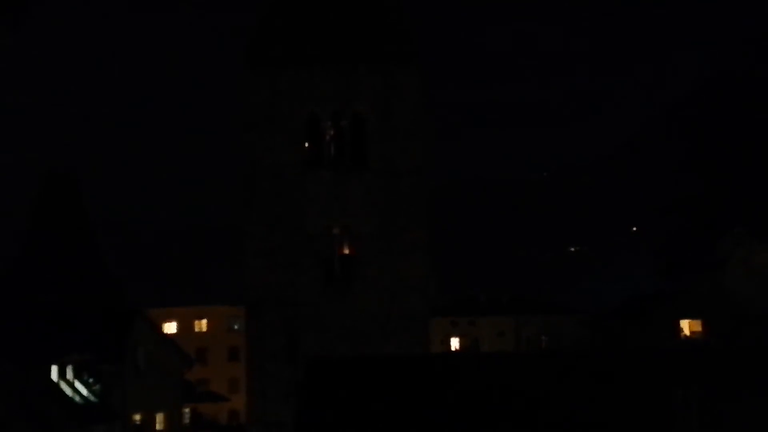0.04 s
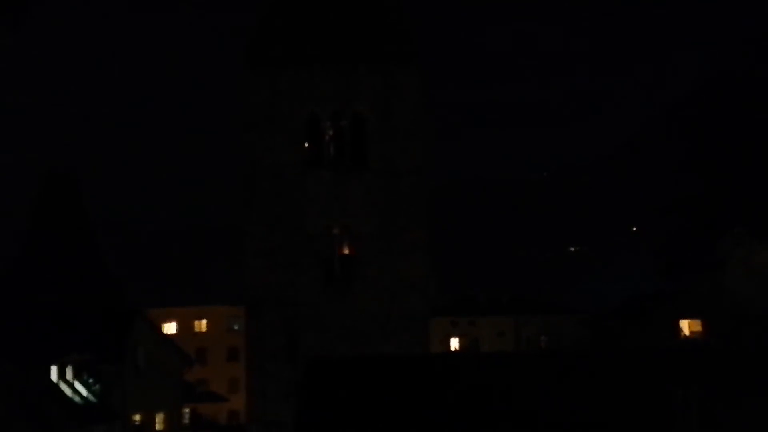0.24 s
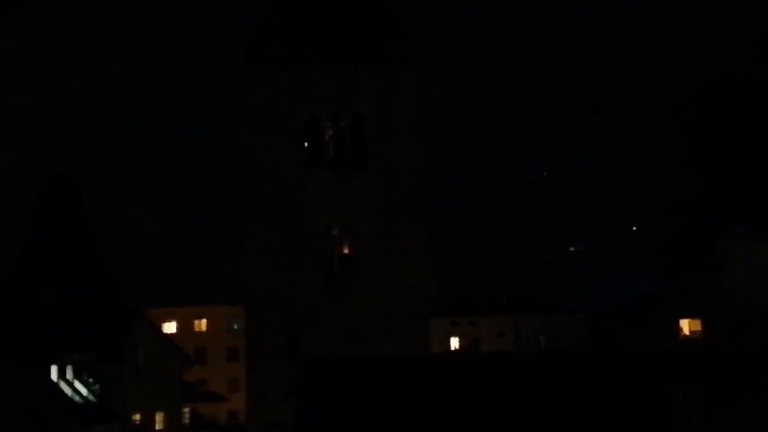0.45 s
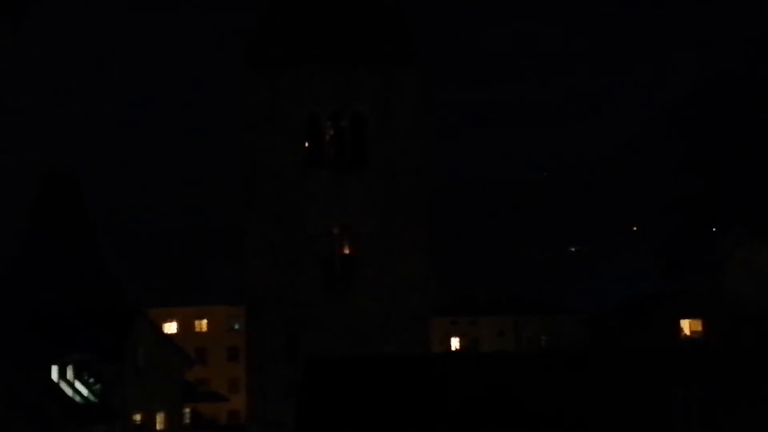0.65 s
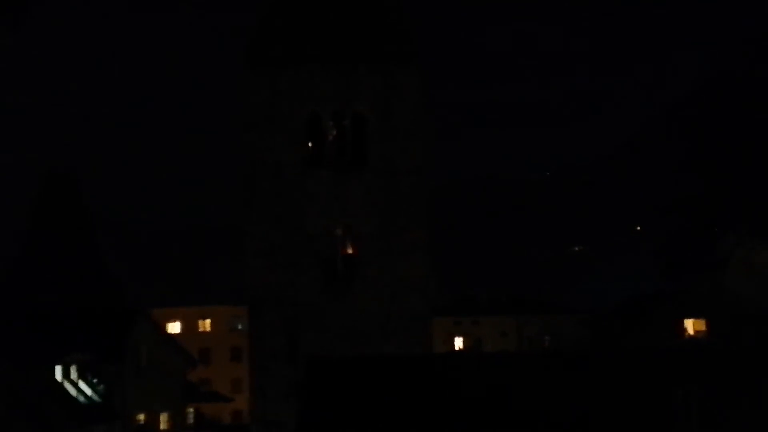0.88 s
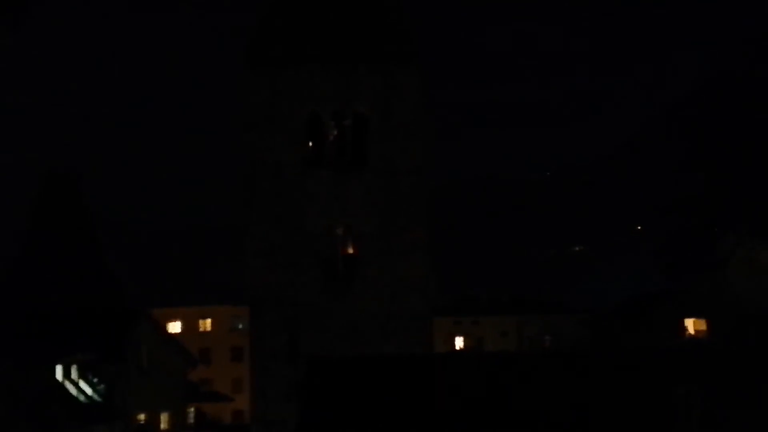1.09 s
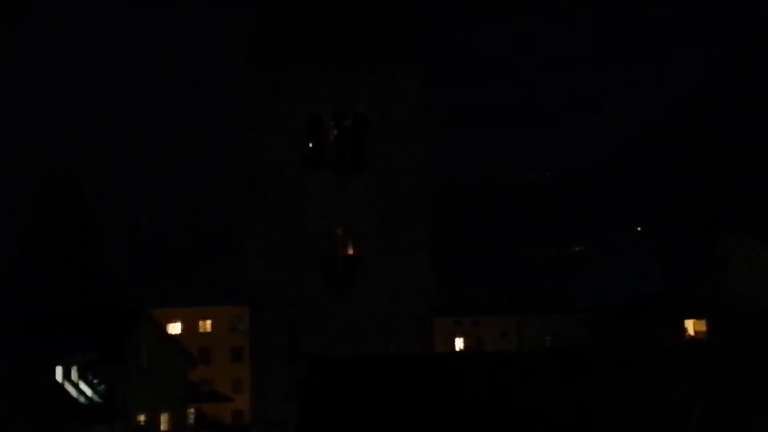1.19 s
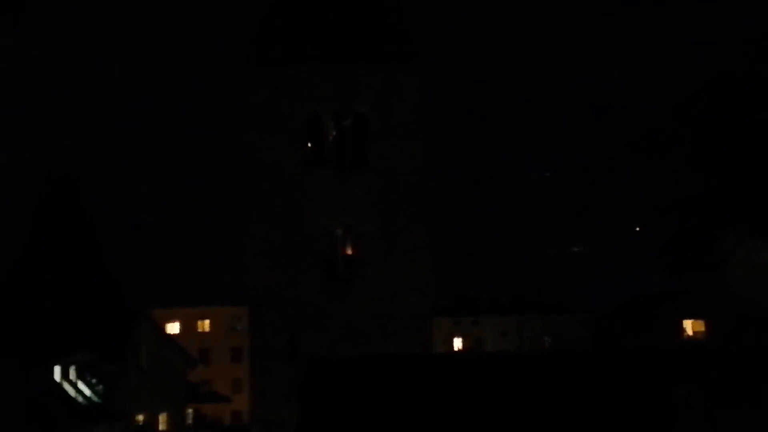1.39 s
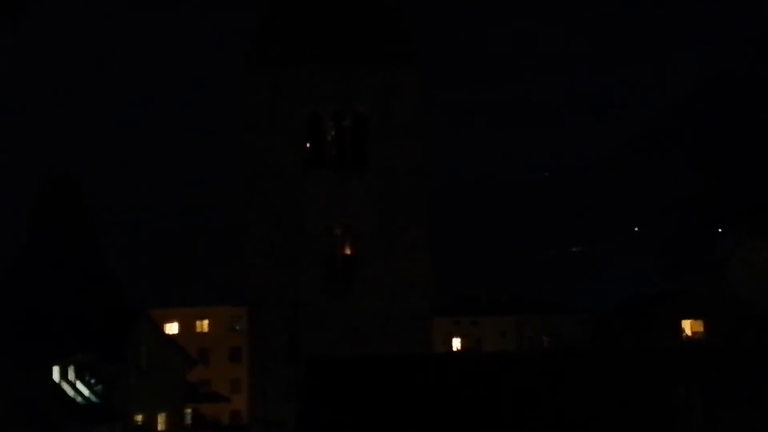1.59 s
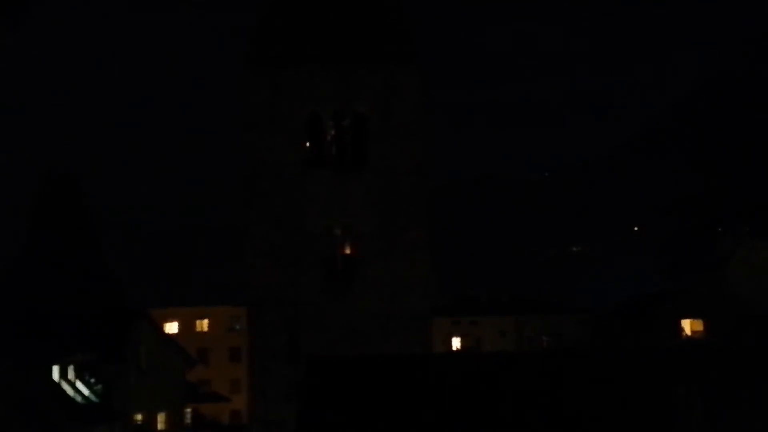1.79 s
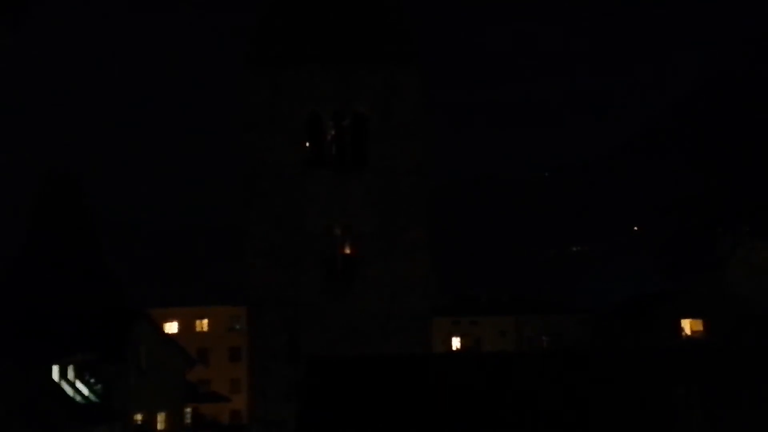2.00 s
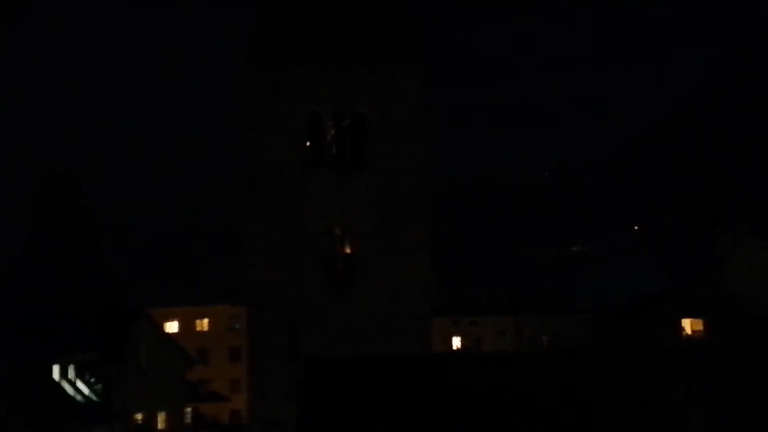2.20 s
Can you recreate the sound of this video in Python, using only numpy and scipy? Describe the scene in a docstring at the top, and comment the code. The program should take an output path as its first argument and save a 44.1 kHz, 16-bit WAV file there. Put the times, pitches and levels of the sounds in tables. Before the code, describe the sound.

A large church bell rings on from earlier blows, then its clapper strikes twice about a second apart; bright metallic clangs, beating partials and short echoes off houses, outdoors at night, heard in stereo from some distance.

```python
"""A church bell already rings from earlier blows, in its tower at night; then the clapper strikes twice, once per lip.
Bell: decaying modes; the swing Doppler-shifts each path to the listener differently, so partials beat, swell and fade.
Clapper: short pitched clanks and a crash of coloured noise, thrown back by houses.
Night: a distant town's faint rumble and hiss as shaped noise, with a low drone that comes and goes."""
import sys
import numpy as np
from scipy import signal
from scipy.fft import rfft, irfft
from scipy.io import wavfile
from scipy.ndimage import uniform_filter1d

SR = 44100
rng = np.random.default_rng(int(sys.argv[2]) if len(sys.argv) > 2 else 0)


def dump(signal):
    """Clip the signal to [-1, 1] and save it as 16-bit WAV at the path in sys.argv[1]."""
    limited = np.clip(np.atleast_2d(signal).T, -1, 1)
    pcm = np.round(limited * 32767).astype(np.int16)
    wavfile.write(sys.argv[1], SR, pcm)


N = 99225
ATTACK_S, BUILD_S = .0015, .02  # first rise of a blow; filling of the belfry

# clapper blows; negative times precede the scene: start_s, lip (0 or 1), strength_db
BLOWS = [(-1.48, 0, 1.5), (-0.74, 1, -3), (.205, 0, 2.6), (1.26, 1, 2)]


def amp(db):
    """Gain from dB."""
    return 10 ** (np.asarray(db) / 20)


def evened(x):
    """Scale to rms 1."""
    return x / np.sqrt(np.mean(abs(x) ** 2) + 1e-20)


def read(points, hz):
    """Interpolate a table straight on a log-frequency axis."""
    table_hz, value = np.transpose(points)
    return np.interp(np.log(hz + 1), np.log(table_hz), value)


def curve(points):
    """Gain per sample from (time_s, db) points."""
    return amp(np.interp(np.arange(N) / SR, *np.transpose(points)))


def onset(age_s, rise_s):
    """Exponential approach to full level."""
    return 1 - np.exp(-age_s / rise_s)


def decay(age_s, t60_s):
    """Exponential decay, 60 dB down after t60_s."""
    return np.exp(-np.log(1000) * age_s / t60_s)


def add(mix, start_s, sound):
    """Mix a sound in at start_s, cut at the end of the scene."""
    part = mix[:, round(start_s * SR):]
    part += sound[:, :part.shape[1]]


def noise(spectrum, same, peaks_db=0):
    """Stereo Gaussian noise of rms 1 with a given colour and left-right likeness."""
    hz = np.fft.rfftfreq(N, 1 / SR)
    a, b = rfft(rng.standard_normal((2, N)))
    likeness = np.clip(read(same, hz), -1, 1)
    right = likeness * a + np.sqrt(1 - likeness ** 2) * b
    gain = amp(read(spectrum, hz) + peaks_db)
    return evened(irfft(np.array([a, right]) * gain, N))


def bell():
    """Each blow adds power to every mode, which dies at its own rate and beats through the swing."""
    # modes of the bell: pitch_hz, lip_0_level_db, lip_1_level_db, t60_s, left_minus_right_db
    modes = [(467.5, -45, -45, 8, 9), (971.5, -40, -44.7, 6.7, 2), (1171, -35, -36.5, 3.5, 4),
             (1522, -44, -44, 2.4, 4), (2020, -34.7, -32.4, 2.3, 0), (3034, -38, -41, 1.7, -5),
             (2458, -46, -47, 1.6, -4), (2662, -49, -46, 1.6, 2), (3835, -61, -60, 1.3, -10),
             (4170, -44, -42, 1.22, -6), (5402, -50, -49, 1.2, 1), (6268, -67, -65, .8, 0),
             (6662, -62, -56, .9, -1), (7968, -72, -63.5, .95, 5), (9324, -74, -67, .8, 1),
             (10664, -84, -76, .6, -4), (1238, -62, -55, 2, 2), (1809, -63, -61, 2.1, 4),
             (2587, -56, -50, 1.5, .1), (3354, -65, -60, 1.5, -7), (4728, -67, -69, 1.3, 2),
             (4990, -67, -63, 1.1, 1), (5310, -63, -63, 1.1, 1), (9819, -83, -88, .8, 1),
             (12080, -89, -87, .5, 1)]
    # extra swell and fade of the strongest partials, keyed by row of modes: time_s, gain_db
    swells = {0: [(0.02, 3), (0.1, -5.5), (0.3, 3.5), (0.4, -9), (0.74, -6.5), (0.84, 2.5), (0.92, -3.5),
              (0.98, 6), (1.34, 0.5), (1.38, -5), (1.82, 2), (1.9, -8), (1.96, 5.5), (2.14, -7.5),
              (2.22, -3.5)], 1: [(0.02, -5), (0.26, -0.5), (0.29, 7.5), (0.41, -6.5), (0.65, -9.5),
              (0.71, 7.5), (0.77, 4.5), (0.86, -24.5), (0.92, 4), (1.04, 2), (1.07, 7), (1.31, 2),
              (1.4, 10), (1.46, 3), (1.7, -3), (2.22, -1)], 2: [(0.02, -4), (0.12, 0.5), (0.16, -18),
              (0.24, 3), (0.3, -11.5), (0.38, 3), (0.76, 0.5), (1.04, -2), (1.08, 2.5), (1.3, -6),
              (1.36, -10), (1.4, -1), (1.74, -1), (1.78, -11), (1.82, 8), (1.88, -5.5), (1.96, 3.5),
              (2.02, -17), (2.08, 0.5), (2.22, -3)], 3: [(0.02, 2), (0.24, -10.5), (0.36, 5.5), (0.5, -18),
              (0.52, 1.5), (0.58, 1.5), (0.64, -3.5), (0.98, 3), (1.3, 5), (1.36, 0), (1.52, 10),
              (1.6, -11), (1.68, 5), (1.76, -12), (1.86, 3), (2.22, -5.5)], 4: [(0.02, 2.5), (0.32, -1.5),
              (0.44, -1.5), (0.53, 11), (0.59, 1.5), (0.83, 4.5), (0.95, -0.5), (1.28, -4), (1.31, 7),
              (1.37, -1), (1.46, 6.5), (1.52, -11), (1.55, -0.5), (1.67, -4), (1.79, 5), (2.22, -3)],
              5: [(0.02, 4.5), (0.29, -3), (0.38, 1.5), (1.34, 1.5), (1.43, 7), (1.46, 2.5), (1.58, -3.5),
              (1.64, 9), (1.7, -21), (1.73, -2), (2.22, -2)]}
    # part of a partial that arrives only as the belfry fills: pitch_hz, share (0-1)
    build_share = [(470, .8), (1200, 0.14), (2000, .35), (3000, 1), (9000, 0.45)]
    t = np.arange(N) / SR
    out = np.zeros((2, N))
    ages_s = [np.maximum(t - start_s, 0) for start_s, _, _ in BLOWS]
    rises = [onset(age_s, ATTACK_S) for age_s in ages_s]
    unfilled = [np.exp(-age_s / BUILD_S) for age_s in ages_s]
    for k, (hz, *lip_db, t60_s, pan_db) in enumerate(modes):
        share = np.clip(read(build_share, hz), 0, 1)
        power = np.zeros(N)
        for (_, lip, db), age_s, rise, early in zip(BLOWS, ages_s, rises, unfilled):
            struck = amp(db + lip_db[round(lip)])
            power += (rise * (1 - share * early) * struck * decay(age_s, t60_s)) ** 2
        level = np.sqrt(power)
        if k in swells:
            level = level * curve(swells[k])
        pan = evened(amp([[pan_db / 2], [-pan_db / 2]]))
        partial = (paths(hz) * np.exp(2j * np.pi * hz * t)).real
        out += pan * level * partial
    return out


def paths(hz, count=24):
    """Beating of one partial: direct sound plus echoes, each Doppler-shifted by the swing along its path."""
    swing_s, turn_s, swing_m = 2.11, .47, 1.1  # period; a moment of rest at the top; travel of the lip
    sound_m_per_s = 343
    direct_aim = 0.3002  # share of the travel that lies along the direct path
    echo_db, echo_delay_s = 3, 0.1104  # level relative to direct; mean delay
    steady_s = .085  # span over which the power is levelled
    step = 44  # samples between computed points
    # phase spread of the echoes between the ears: pitch_hz, spread_rad
    ear_spread = [(470, 0.58), (1000, 0.78), (2000, 0.95), (6000, 1.14)]
    t = np.arange(0, N + step, step) / SR

    def travel_m(time_s):
        return swing_m * np.cos(2 * np.pi * (time_s - turn_s) / swing_s)

    wavenumber = 2 * np.pi * hz / sound_m_per_s
    aim = rng.permutation(np.linspace(-1, 1, count))[:, None]
    delay_s = echo_delay_s * rng.exponential(1, (count, 1))
    phase = 2 * np.pi * rng.random(count) + read(ear_spread, hz) * rng.standard_normal((2, count))
    echoes = np.exp(1j * phase) @ np.exp(1j * wavenumber * aim * travel_m(t - delay_s))
    direct = np.exp(-1j * wavenumber * direct_aim * travel_m(t))
    field = direct + amp(echo_db) * evened(echoes)
    power = (abs(field) ** 2).mean(0)
    field = field / np.sqrt(uniform_filter1d(power, max(2, round(steady_s * SR / step))))
    return np.array([np.interp(np.arange(N) / SR, t, evened(ear)) for ear in field])


def clapper():
    """A clank and a clang for each blow within the scene; those of earlier blows have died away."""
    # clang on lip 0, then lip 1: level_db
    clang_db = [-43.5, -39.5]
    out = np.zeros((2, N))
    peaks_db = thicket()
    for start_s, lip, db in BLOWS:
        if start_s > 0:
            lip = round(lip)
            add(out, start_s, amp(db) * clank(lip))
            add(out, start_s, amp(db + clang_db[lip]) * clang(lip, peaks_db))
    return out


def clang(lip, peaks_db):
    """Iron on bronze: a short dense noise crash, its wash between the houses and two dull echoes."""
    hold_s, t60_s = 0.042, 0.12
    tail_db, slap_dull_hz = -6, 2800
    likeness = 0.25  # left to right
    # colour of the crash: frequency_hz, relative_db_per_hz
    colour = [(100, -41), (300, -16), (520, -16.5), (780, -15.5), (1100, -3), (1300, -9), (1620, -13.5),
              (1930, -2), (2120, 0), (2300, -13.5), (2540, -2.5), (2720, -11), (2900, -16), (4000, -16),
              (5400, -21), (7500, -32.5), (10500, -56), (14000, -72)]
    # decay of the wash: frequency_hz, t60_s
    tail_t60 = [(300, 0.73), (2300, 1.94), (4500, 0.61), (10000, 1.7)]
    # echoes from houses: delay_s, lip_0_gain_db, lip_1_gain_db
    slaps = [(0.158, -11, -11.5), (0.476, -16, -12)]
    t = np.arange(N) / SR

    def crash():
        return noise(colour, [(1, likeness)], peaks_db)

    burst = onset(t, ATTACK_S) * decay(np.maximum(t - hold_s, 0), t60_s)
    hz, age_s, spectra = signal.stft(crash(), SR, nperseg=512)
    faded = spectra * decay(age_s, read(tail_t60, hz)[:, None])
    tail = signal.istft(faded, SR, nperseg=512)[1][:, :N]
    out = burst * crash() + amp(tail_db) * tail * onset(t, BUILD_S)
    low_pass = signal.butter(3, slap_dull_hz, fs=SR)
    for delay_s, *lip_db in slaps:
        dull = signal.lfilter(*low_pass, crash())
        add(out, delay_s, amp(lip_db[lip]) * burst * dull)
    return out


def thicket():
    """Random narrow peaks and dips (dB) of the bell's many weak modes, which colour the clang."""
    height_db, spacing_hz = 3.5, 45
    knots_hz = np.arange(0, SR / 2, spacing_hz)
    heights = np.clip(rng.standard_normal(len(knots_hz)), -2, 2)
    return height_db * np.interp(np.fft.rfftfreq(N, 1 / SR), knots_hz, heights)


def clank(lip):
    """Brief pitched ring of the blow: decaying sines."""
    spread_rad = 0.23  # phase spread between the ears
    # short-lived modes of clapper and lip: pitch_hz, lip_0_level_db, lip_1_level_db, t60_s
    short_modes = [(2457, -42, -32, .33), (2589, -52, -42, .3), (2010, -39, -31, .13),
                   (1162, -40, -36, .25), (1400, -58, -47, .16), (1850, -43, -45, .17),
                   (1925, -43, -42, .17), (2724, -54, -47, .2), (5250, -55, -53, .2)]
    t = np.arange(N) / SR
    count = len(short_modes)
    phases = 2 * np.pi * rng.random((count, 1, 1)) + spread_rad * rng.standard_normal((count, 2, 1))
    ring = np.zeros((2, N))
    for (hz, *lip_db, t60_s), phase in zip(short_modes, phases):
        ring += amp(lip_db[lip]) * decay(t, t60_s) * np.sin(2 * np.pi * hz * t + phase)
    return onset(t, ATTACK_S) * ring


def night():
    """Soft rumble and hiss from shaped noise, plus a narrow-band low drone that comes and goes."""
    air_db = -55
    drone_hz, drone_width_hz = 59.5, 4
    # colour of the night air: frequency_hz, relative_db_per_hz
    air = [(20, 1.5), (55, -4.5), (100, -4), (190, -3), (270, -11.5), (380, -6), (600, -13), (900, -17.5),
           (2000, -26.5), (4000, -37.5), (7000, -44.5), (9000, -51), (15000, -55)]
    # left-right likeness of the air: frequency_hz, likeness (0-1)
    air_same = [(50, .76), (200, .84), (800, .55), (8000, .3)]
    # slow change of the air: time_s, gain_db
    air_swell = [(0, 0), (.7, -0.5), (.95, 0.5), (1.5, 1.5), (2.25, 0)]
    # the far drone: time_s, level_db
    drone_level = [(0, -73.5), (.7, -65.5), (.82, -57), (1.05, -55.5), (1.14, -68.5), (1.8, -72.5),
                   (1.92, -55), (2.1, -55), (2.25, -56)]
    hz = np.fft.rfftfreq(N, 1 / SR)
    shape = 1 + ((hz - drone_hz) / drone_width_hz) ** 4
    band = signal.hilbert(irfft(rfft(rng.standard_normal(N)) / shape, N))
    drone = evened(band.real / np.sqrt(abs(band) + 1e-9))  # halves its level swings in dB
    return amp(air_db) * curve(air_swell) * noise(air, air_same) + curve(drone_level) * drone


def scene():
    """Bell, clapper and night air."""
    return bell() + clapper() + night()


def record(dry):
    """The recorder's band limit: a linear-phase low-pass."""
    edge_hz = 15100
    low_pass = signal.firwin(511, edge_hz, window=("kaiser", 9), fs=SR)
    return signal.oaconvolve(dry, low_pass[None], "same")


dry = scene()
out = record(dry)
dump(out)
```